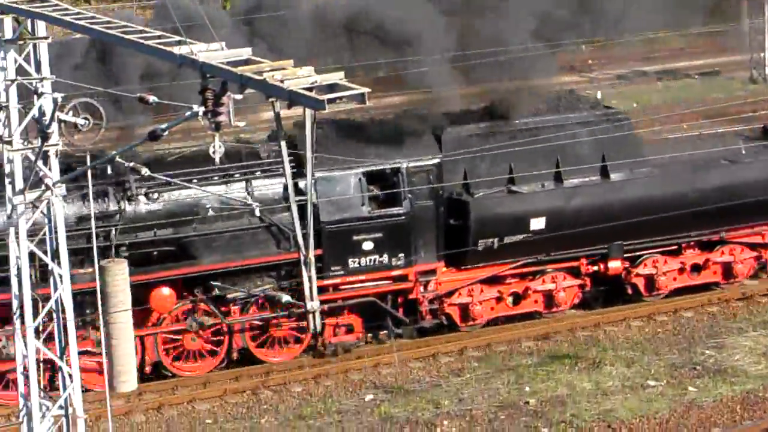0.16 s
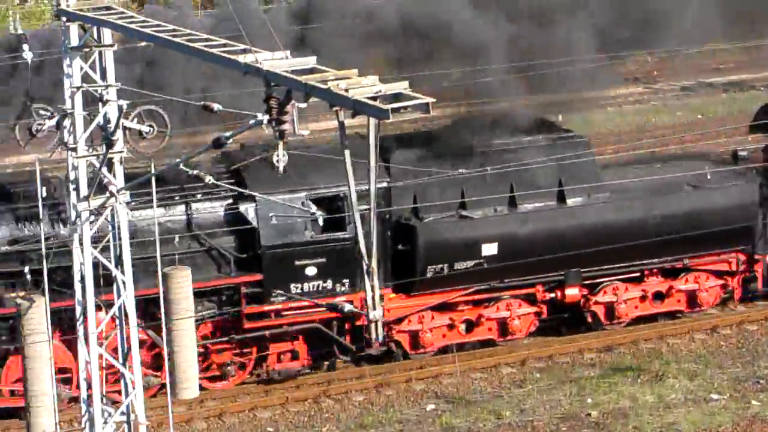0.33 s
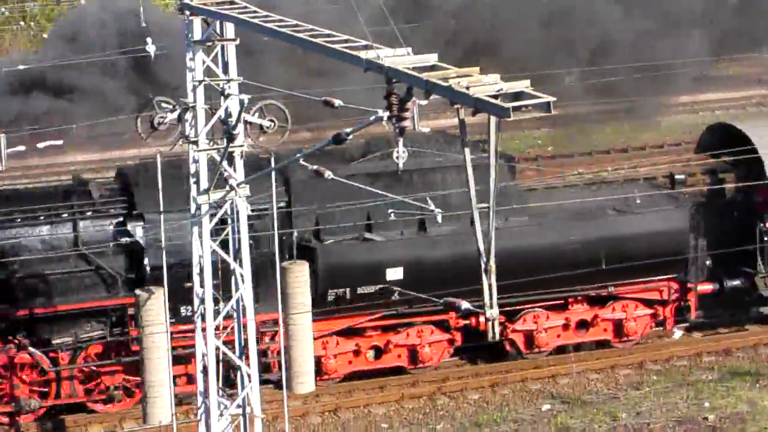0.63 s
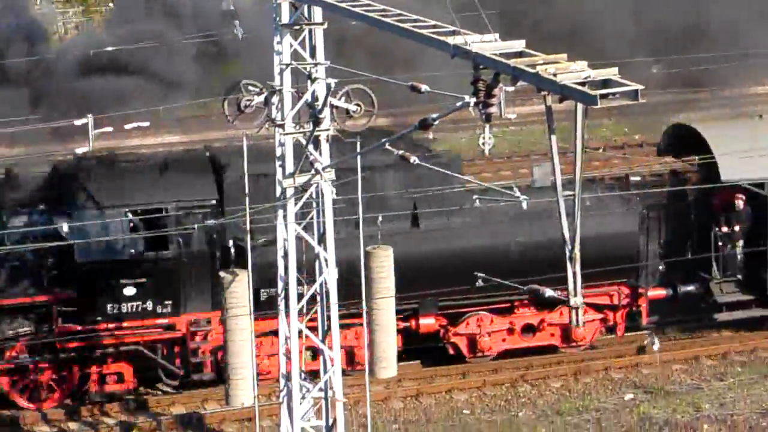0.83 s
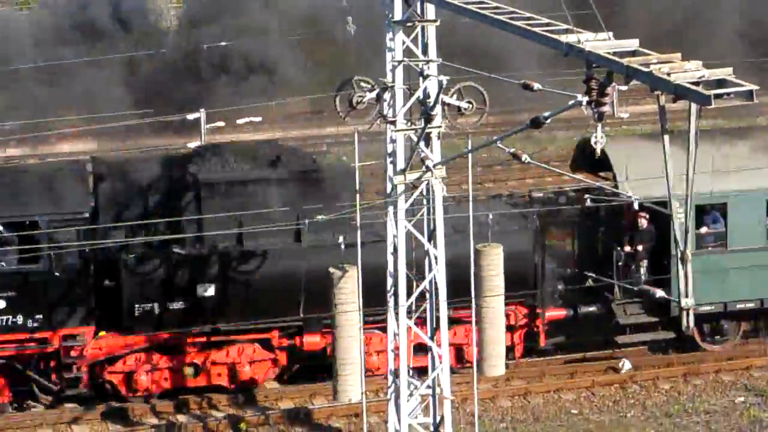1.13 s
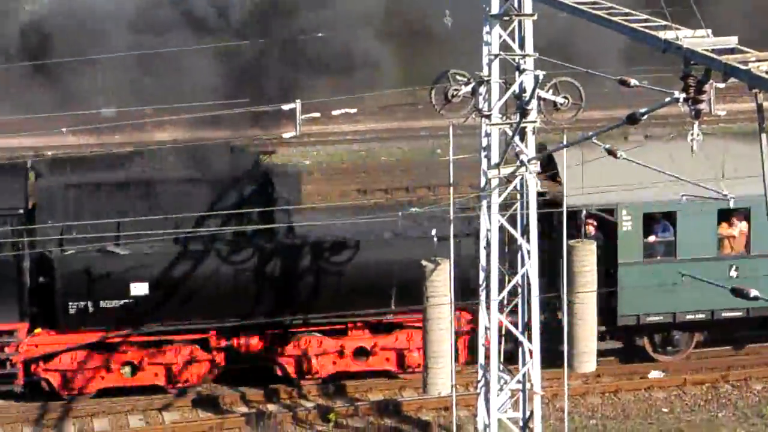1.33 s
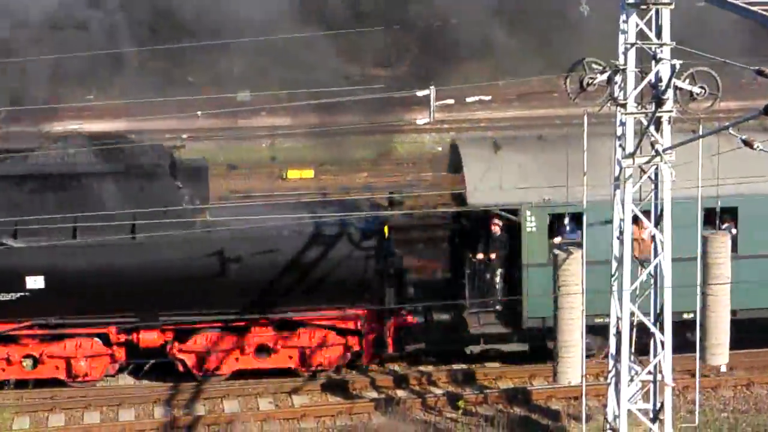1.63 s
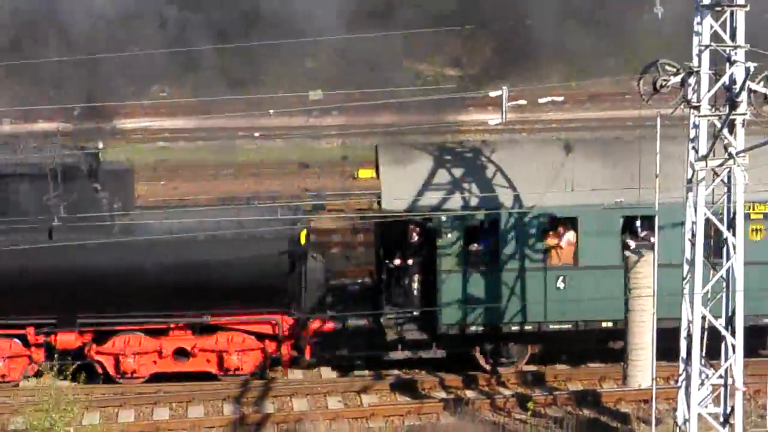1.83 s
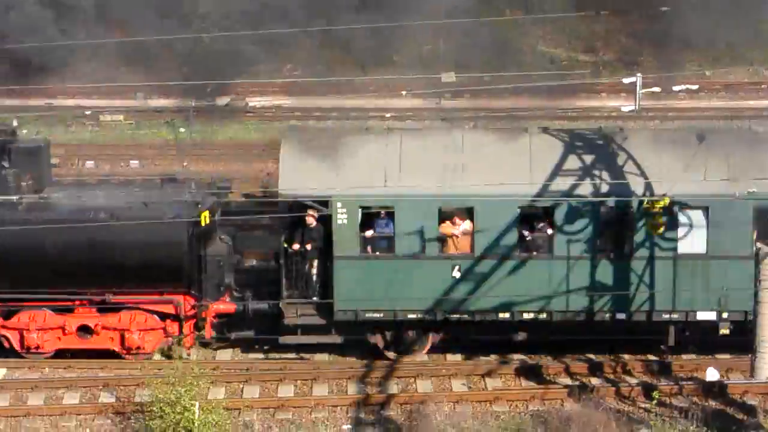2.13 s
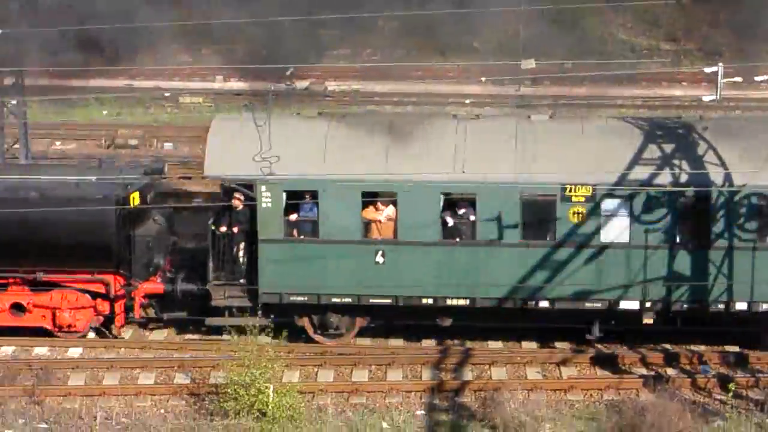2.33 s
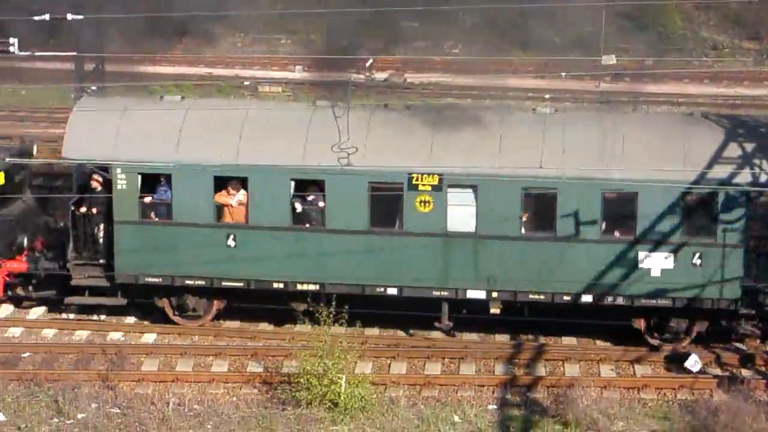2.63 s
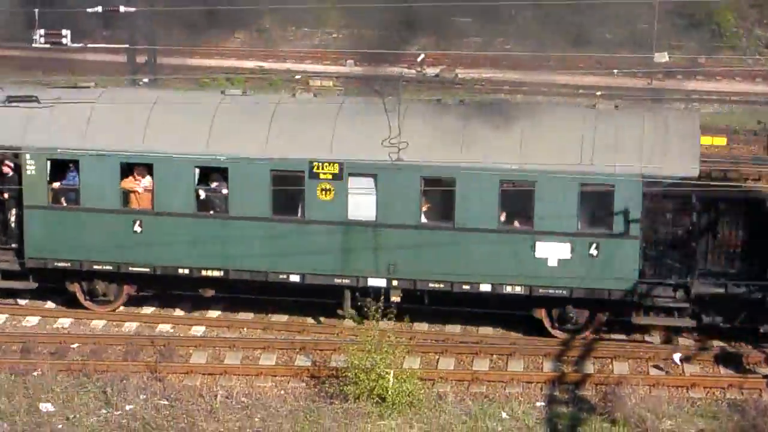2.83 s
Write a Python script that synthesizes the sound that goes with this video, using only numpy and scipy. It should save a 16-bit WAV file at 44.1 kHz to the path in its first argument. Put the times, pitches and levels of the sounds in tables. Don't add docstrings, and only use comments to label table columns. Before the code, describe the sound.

A steam train passes close by outdoors: continuous rushing exhaust with soft uneven beats, low wheel rumble and joint thumps, faint rod clanks and hollow knocks, steam hiss receding, heard in stereo from the lineside.

```python
import sys
import numpy as np
from scipy import signal
from scipy.fft import rfft, irfft, next_fast_len
from scipy.io import wavfile
from scipy.ndimage import uniform_filter1d, map_coordinates

SR = 44100
rng = np.random.default_rng(int(sys.argv[2]) if len(sys.argv) > 2 else 0)


def makeup_ratio(level_db):
    decades = np.asarray(level_db, float) / 20
    return 10 ** decades


def pcm_store(signal):
    levels = np.round(np.clip(np.atleast_2d(signal), -1, 1) * 32767)
    wavfile.write(sys.argv[1], SR, levels.astype(np.int16).T)


N = 130977


def unit(x):
    return x / np.sqrt(np.mean(x ** 2) + 1e-20)


def along(points, hz):
    f, v = np.transpose(points)
    return np.interp(np.log(hz + 1), np.log(f + 1), v)


def curves(rows):
    s, *cols = np.transpose(rows)
    return [np.interp(np.arange(N) / SR, s, c) for c in cols]


def wobble(rate):
    return map_coordinates(rng.standard_normal(400), [np.arange(N) * rate / SR], mode="wrap")


def filtered(x, response):
    m = next_fast_len(N + SR // 2)
    spectrum = rfft(x, m) * response(np.fft.rfftfreq(m, 1 / SR))
    return irfft(spectrum, m)[..., :N]


# frequency in Hz, likeness from 0 to 1.
LIKENESS = [(100, 0.99), (700, .99), (1500, 0.97), (3000, 0.87), (6000, 0.6), (11000, 0.59), (12300, 0.85)]


def rush(spectrum, patchy_db, grainy_db):
    z = signal.stft(rng.standard_normal((2, N)), nperseg=512)[2]
    field = uniform_filter1d(rng.standard_normal(z.shape[1:]), size=6, axis=0)
    field = uniform_filter1d(field, size=8, axis=1)
    pair = signal.istft(z * makeup_ratio(patchy_db * unit(field)), nperseg=512)[1][:, :N]
    flutter = unit(uniform_filter1d(rng.standard_normal(N), size=90))
    pair = pair * makeup_ratio(grainy_db * flutter)
    points = [(5.2, -86)] + list(spectrum) + [(16000, -120)]

    def colour_and_width(hz):
        turn = np.arccos(np.clip(along(LIKENESS, hz), -1, 1)) / 2
        return makeup_ratio(along(points, hz)) * [np.cos(turn), np.sin(turn)]

    mid, side = filtered(pair, colour_and_width)
    return unit(np.array([mid + side, mid - side]))


def puffs(events, rise_s, fall_s):
    starts = np.array([e[0] for e in events])[:, None]
    t = np.clip(np.arange(N) / SR - starts, 0, None)
    return makeup_ratio([e[1] for e in events]) @ ((1 - np.exp(-t / rise_s)) * np.exp(-t / fall_s))


def swells(events, half_s, extra_db=0, sag=0):
    out = np.zeros(N + SR)
    t = np.arange(round(2 * half_s * SR)) / SR
    window = np.sin(np.pi * t / (2 * half_s)) ** 2
    for s, db, hz in events:
        cycles = hz * t * (1 + sag * (hz < 3000) * (1 - t / (2 * half_s)))
        start = round((s - half_s + .5) * SR)
        out[start:][:len(t)] += makeup_ratio(db + extra_db) * window * np.sin(2 * np.pi * cycles)
    return out[SR // 2:][:N]


# time in seconds, exhaust effort in dB, rolling load in dB.
TRAIN_PASS = [
    (0, -19.5, -26.5),
    (.3, -18.5, -28),
    (.55, -19, -26.5),
    (.85, -19.5, -23),
    (1.25, -20, -23),
    (1.55, -18, -22.5),
    (1.88, -20, -25),
    (2.2, -19, -23.5),
    (2.97, -18.5, -20.5),
]
# start in seconds, level in dB.
EXHAUST_BEATS = [(.11, -13), (.24, -8), (.28, -11), (.365, -18), (.515, -12), (.612, -6.5), (.695, -10.5),
                 (.745, -11), (.83, -15.5), (.86, -9.5), (.99, -8.5), (1.07, -9.5), (1.16, -6.5),
                 (1.268, -12), (1.395, -12), (1.47, -18), (1.56, -14), (1.7, -9.5), (1.925, -17),
                 (1.988, -10), (2.135, -8.5), (2.2, -16), (2.305, -20), (2.4, -20), (2.46, -19),
                 (2.615, -10), (2.685, -15), (2.81, -26), (2.915, -16)]
BEAT_RISE_S, BEAT_FALL_S, BEAT_DB = .012, .03, -14
# frequency in Hz, density in dB per Hz.
ROAR_COLOUR = [(150, -2.5), (400, -2), (780, -1), (1100, -3.5), (2200, -8.5), (3500, -13), (5000, -19.5),
               (9000, -32)]


def exhaust():
    effort_db = curves(TRAIN_PASS)[0]
    roar = makeup_ratio(effort_db - 0.72 + 0.4 * wobble(8.1)) * rush(ROAR_COLOUR, patchy_db=1.23, grainy_db=0.0)
    beat_colour = [(300, -4), (900, -0.5), (1600, -1.5), (2500, -5.5), (5000, -14), (12000, -32.5)]
    push = makeup_ratio(BEAT_DB + 8.5) * puffs(EXHAUST_BEATS, BEAT_RISE_S, BEAT_FALL_S)
    return roar + push * rush(beat_colour, patchy_db=1.5, grainy_db=0.5)


def chimney():
    centre_hz, wide_hz, level_db, fade_db_per_s = 840, 201, -31, -5

    def tone(f):
        return (1j * f * wide_hz / (centre_hz ** 2 - f * f + 1j * f * wide_hz)) ** 2

    push = 1 + unit(puffs(EXHAUST_BEATS, BEAT_RISE_S, 2 * BEAT_FALL_S)) / 2
    fade = makeup_ratio(level_db + fade_db_per_s * np.arange(N) / SR)
    return fade * push * unit(filtered(rng.standard_normal(N), tone))


# frequency in Hz, density in dB per Hz.
RUMBLE_COLOUR = [(40, -29), (63, -23.5), (85, -9), (115, -5.5), (180, -1.5), (240, -1.5), (330, -6),
                 (500, -26)]
# middle in seconds, level in dB, pitch in Hz.
WHEEL_THUMPS = [(0.11, -16, 184), (0.164, -18, 241), (0.247, -16.5, 220.5), (0.301, -21, 273),
                (0.327, -15, 202), (0.383, -17, 182), (0.431, -16, 246), (0.501, -17, 220),
                (0.553, -18, 177), (0.708, -19, 203), (0.76, -15, 220), (0.966, -18.5, 214),
                (1.036, -16.5, 147.6), (1.086, -16, 326), (1.139, -20, 251), (1.235, -27, 169),
                (1.329, -16, 230), (1.381, -11, 176), (1.503, -15, 260), (1.56, -25, 250),
                (1.59, -16.5, 179.4), (1.616, -15.5, 235), (1.67, -14, 226), (1.766, -22, 194),
                (1.894, -20, 302), (1.898, -14, 233), (1.922, -15.5, 180), (1.974, -22, 244),
                (2.023, -20, 240), (2.061, -16.5, 195), (2.127, -17, 202), (2.251, -15.5, 186.7),
                (2.379, -19, 192), (2.422, -20, 319), (2.426, -17, 180), (2.472, -15.5, 250),
                (2.508, -19, 262), (2.566, -17, 230), (2.578, -24, 154), (2.616, -20, 201),
                (2.67, -16.5, 174), (2.708, -17, 253), (2.786, -18, 197), (2.846, -23, 255)]
# middle in seconds, level in dB, pitch in Hz.
AXLE_THUDS = [(0.114, -23, 126), (0.174, -29, 129), (0.237, -28.5, 123), (0.333, -23.5, 129),
              (0.373, -25, 107), (0.439, -25, 116), (0.521, -22, 129), (0.565, -24.5, 135),
              (0.607, -26, 101), (0.682, -23, 121), (0.918, -21, 120), (1.09, -21.5, 123),
              (1.225, -24, 119), (1.279, -21.5, 143), (1.405, -20.5, 118), (1.576, -23.5, 111),
              (1.63, -27, 116), (1.72, -22, 111.5), (1.782, -21, 113.7), (1.932, -29, 103),
              (2.087, -25, 117), (2.161, -23, 132), (2.281, -21.5, 122), (2.333, -26, 100),
              (2.355, -28, 138), (2.42, -25.5, 122), (2.49, -27, 111), (2.674, -22, 110.4),
              (2.736, -24, 132.3), (2.788, -25, 123), (2.895, -22, 116.7)]


def wheels():
    load_db = curves(TRAIN_PASS)[1]
    rumble = makeup_ratio(load_db - 0.5) * rush(RUMBLE_COLOUR, patchy_db=.5, grainy_db=0)
    thumps = swells(WHEEL_THUMPS, half_s=0.03, extra_db=-2)
    thuds = swells(AXLE_THUDS, half_s=0.0444, extra_db=1)
    return rumble + thumps + thuds


# middle in seconds, level in dB, pitch in Hz.
ROD_CLANKS = [(.134, -24.5, 1863), (.527, -30, 2137), (.569, -24, 2021), (.842, -23, 2213),
              (.878, -32, 3723), (.984, -29, 3714), (1.241, -26, 3604), (1.272, -39, 5281),
              (1.286, -25, 2640), (1.296, -25, 2454), (1.293, -25, 3763), (1.415, -30, 5286),
              (1.487, -21.5, 2048), (1.592, -29, 1822), (1.718, -33, 3701), (2.003, -24, 2056),
              (2.006, -34, 5270), (2.654, -27, 2460)]
# middle in seconds, level in dB, pitch in Hz.
VALVE_TICK = [
    (.384, -33, 5650),
    (.384, -44, 9000),
    (.386, -38, 10800),
]
# middle in seconds, level in dB, pitch in Hz.
FRAME_KNOCKS = [(0.032, -20, 670), (0.05, -20, 837), (0.186, -18, 557), (0.243, -18, 910),
                (0.271, -20, 983), (0.301, -14, 842), (0.313, -15, 602), (0.437, -15, 876),
                (0.485, -21, 640), (0.565, -19, 855), (0.629, -18, 1087), (0.744, -20, 872),
                (0.76, -21, 587), (0.842, -24, 1346), (0.844, -19, 594), (0.868, -22, 804),
                (0.902, -13, 807), (0.974, -21, 825), (1.052, -24, 765), (1.155, -17, 816),
                (1.349, -17.5, 885), (1.409, -12, 647), (1.423, -17, 873), (1.67, -18.5, 715),
                (1.722, -15, 972), (2.059, -19, 1194), (2.233, -18, 690), (2.359, -24, 840),
                (2.377, -18, 653), (2.42, -18.5, 1273), (2.426, -21, 1055), (2.432, -17, 729),
                (2.486, -25, 826), (2.486, -20, 597), (2.63, -16.5, 958), (2.75, -17, 568),
                (2.776, -14.5, 707), (2.834, -15.5, 727)]


def rods():
    ragged = makeup_ratio(2 * unit(uniform_filter1d(rng.standard_normal(N), size=200)))
    clanks = swells(ROD_CLANKS, half_s=.016, sag=.065) * ragged
    knocks = swells(FRAME_KNOCKS, half_s=0.022, extra_db=-5)
    return clanks + swells(VALVE_TICK, half_s=0.0079) + knocks


# time in seconds, flow in dB, left over right in dB.
STEAM_LEAK = [(0, -42.5, 2), (.45, -42, 1.5), (.55, -40.5, 2), (.7, -42.5, 5), (1.08, -41, 5.5),
              (1.3, -46.5, 9), (1.42, -44.5, 7), (1.49, -47, 5), (1.63, -40, 7), (1.69, -46.5, 3),
              (1.76, -43, 7), (1.86, -49, 5), (2.03, -42.5, 7), (2.1, -48, 8), (2.24, -45.5, 5),
              (2.3, -49.5, 9), (2.6, -48, 4), (2.97, -50.5, 1)]
# frequency in Hz, density in dB per Hz.
HISS_COLOUR = [(1500, -47), (4000, 10), (7000, -1.5), (10500, 5), (11800, 0), (12700, 3)]
# start in seconds, level in dB.
STEAM_SPIT = [
    (.378, -17),
]
# frequency in Hz, level in dB.
SPIT_TONE = [(4000, -30), (5200, 5), (5800, 11), (7000, 3), (9000, -3), (9900, -11), (10800, 6),
             (12000, -10)]


def leak():
    flow_db, pan_db = curves(STEAM_LEAK)
    lean_db = np.array([pan_db, -pan_db]) / 2
    flow = makeup_ratio(flow_db + 6.5 + wobble(32.66) / 2 + lean_db)
    hiss = flow * rush(HISS_COLOUR, patchy_db=1.1, grainy_db=1.2)
    spit = puffs(STEAM_SPIT, rise_s=0.0037, fall_s=0.008) * rush(SPIT_TONE, patchy_db=5.0, grainy_db=3)
    return hiss + spit


# middle in seconds, level in dB.
SIDE_BURSTS = [(.224, -30), (.458, -33), (.612, -32), (.678, -31), (.873, -26), (1.078, -29), (1.311, -35),
               (1.612, -33), (1.712, -30), (2.039, -29), (2.163, -30), (2.311, -32.5), (2.526, -32),
               (2.723, -34),]
# frequency in Hz, level in dB.
SIDE_BURST_TONE = [(80, -30), (200, -5), (900, 1), (2500, -6), (6000, -25)]


def side_bursts():
    t, spread_s = np.arange(N) / SR, 0.012
    gate = sum(makeup_ratio(db) * np.exp(-((t - s) / spread_s) ** 2 / 2) for s, db in SIDE_BURSTS)
    return gate * rush(SIDE_BURST_TONE, patchy_db=3.0, grainy_db=4.0)[0] * np.array([[1], [-1]])


# frequency in Hz, left over right in dB.
TRAIN_LEAN = [(100, 2), (700, 1.3), (2200, 0), (7000, -2)]


def scene():
    train = exhaust() + chimney() + wheels() + rods()
    leaning = filtered(train, lambda hz: makeup_ratio(np.outer([.5, -.5], along(TRAIN_LEAN, hz))))
    return leaning + leak() + side_bursts()


def microphone(dry):
    notch_hz, wide_hz, depth, gap_hz = 7890, 3080, 0.015, 130
    low_cut_hz, top_hz = 7.2, 12760

    def response(hz):
        off = notch_hz ** 2 - hz ** 2
        notch = (off + 1j * hz * wide_hz * depth) / (off + 1j * hz * wide_hz)
        low_cut = (1j * hz / (low_cut_hz + 1j * hz)) ** 2
        return notch * (abs(hz - notch_hz) > gap_hz) * (hz < top_hz) * low_cut

    return filtered(dry, response)


def gated(x, share):
    power = uniform_filter1d(x ** 2, round(.04 * SR))
    is_open = 1. * (power > np.quantile(power, 1 - share))
    return x * uniform_filter1d(is_open, size=400)


# from Hz, to Hz, share of time kept in mid, share of time kept in side.
WEAK_BANDS = [(7480, 7760, .55, .3), (8020, 8250, .6, .3), (12100, 12760, .63, .08)]


def thin_treble(wet):
    for low, high, mid_share, side_share in WEAK_BANDS:
        band = filtered(wet, lambda hz: (hz >= low) * (hz < high))
        mid = gated((band[0] + band[1]) / 2, mid_share)
        side = gated((band[0] - band[1]) / 2, side_share)
        wet = wet - band + [mid + side, mid - side]
    return wet


def band_limit(x):
    return signal.sosfilt(signal.butter(12, 13710, fs=SR, output="sos"), x)


def record(dry):
    mix = thin_treble(microphone(dry))
    return band_limit(mix)


dry = scene()
out = record(dry)
pcm_store(out)
```